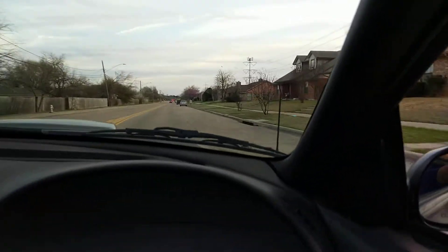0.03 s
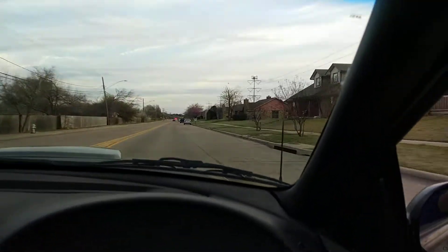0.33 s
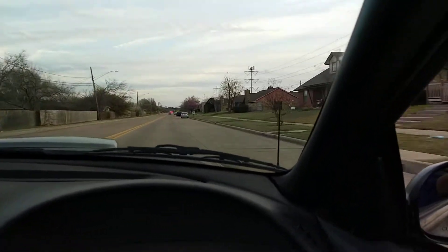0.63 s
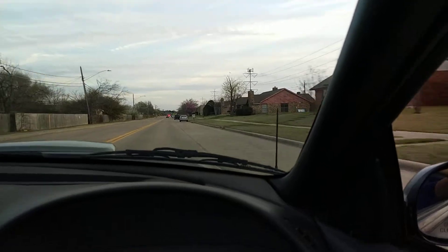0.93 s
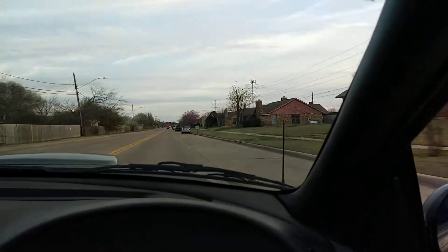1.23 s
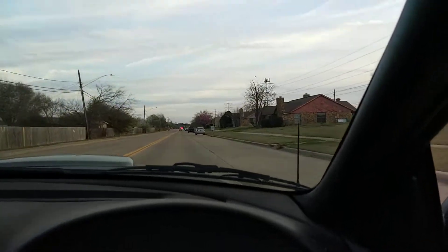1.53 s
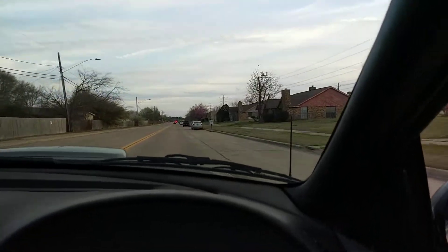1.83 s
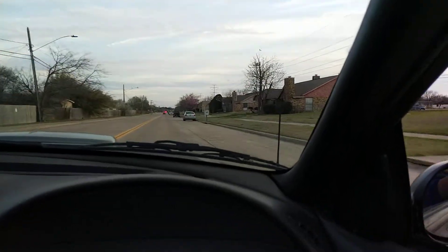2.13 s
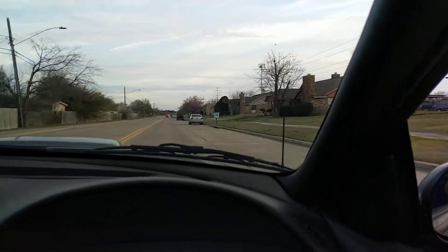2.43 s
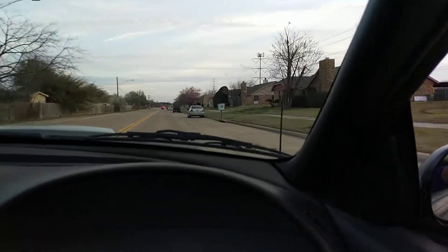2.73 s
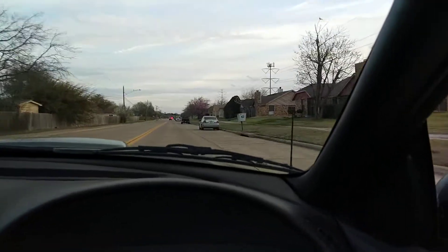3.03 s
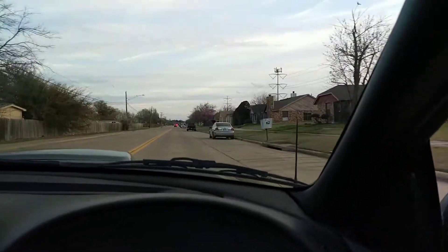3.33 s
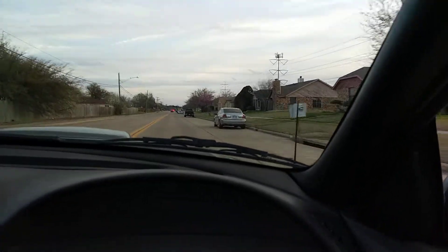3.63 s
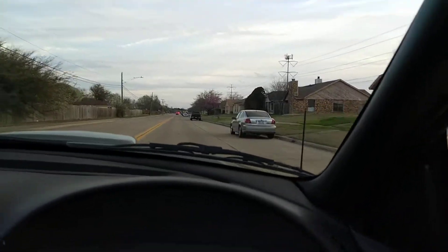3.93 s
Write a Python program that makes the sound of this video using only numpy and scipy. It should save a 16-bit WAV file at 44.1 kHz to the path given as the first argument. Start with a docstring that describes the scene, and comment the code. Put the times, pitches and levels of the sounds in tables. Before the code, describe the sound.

A car's turbo spools up with a breathy whine over the engine, then lets out a rush of air and dying chuffs. From inside the cabin, road rumble carries on, with soft booms and a trim knock.

```python
"""Inside a turbocharged car on a concrete street, microphone at the driver's seat.
The engine drones under load while the turbo whistles upward. Tyres roar throughout; bumps make the
trim knock and the cabin boom. About a second in the throttle closes: the trapped boost rushes out
and flutters in a dying run of chuffs, while the turbo slows and the engine sinks under the road."""
import sys
import numpy as np
from scipy import signal
from scipy.fft import rfft, irfft
from scipy.io import wavfile
from scipy.ndimage import uniform_filter1d

SR = 44100
rng = np.random.default_rng(int(sys.argv[2]) if len(sys.argv) > 2 else 0)


def unload_audio(sound):
    """Save the sound as a 16-bit wav file, at the path given as the first command line argument."""
    columns = np.transpose(np.atleast_2d(sound))
    # keep every value between -1 and 1, then stretch to whole-number steps
    steps = np.round(np.clip(columns, -1, 1) * 32767)
    wavfile.write(sys.argv[1], SR, steps.astype(np.int16))


N = 176400
TIME = np.arange(N) / SR
FREQS = np.maximum(np.fft.rfftfreq(N, 1 / SR), 1)
CUTOFF_HZ = 14250

# turbo spooling up and running down: time_s, whistle_hz, whistle_db, hiss_db
TURBO_SPOOL = [(0, 5000, -77, -47), (.2, 5450, -59, -44.5), (.42, 5880, -54.5, -43), (.8, 6697, -55, -41),
               (1.06, 7340, -52, -41), (1.2, 6900, -65, -50), (1.6, 5350, -72, -70), (2.0, 4190, -80, -78),
               (2.3, 3560, -80, -80), (2.95, 2500, -90, -90)]
# resonances of the intake piping: centre_hz, width_hz, lift_db
PIPE_RESONANCES = [(1870, 110, 5), (2140, 120, 7.5), (2500, 140, 5), (5497, 40, 4.5), (5790, 60, 3),
                   (6110, 50, 3.5), (6530, 55, 4), (7915, 40, 3.5), (10170, 120, 3.5), (11300, 70, 2.5),
                   (12095, 70, 2.5), (12940, 120, 2.5)]


def from_db(db):
    """Decibels to gain."""
    return 10 ** (np.asarray(db) / 20)


def unit_power(x):
    """Scale to unit power."""
    return x / np.sqrt(np.mean(x ** 2) + 1e-20)


def in_time(rows):
    """Each column of a curve, sample by sample."""
    times, *columns = np.transpose(rows)
    return [np.interp(TIME, times, column) for column in columns]


def over_hz(points):
    """A dB table on the frequency grid."""
    hz, db = np.transpose(points)
    return np.interp(np.log(FREQS), np.log(hz), db)


def drift(rate_hz):
    """Random wander with spread 1, mostly slower than rate_hz."""
    return unit_power(irfft(rfft(rng.standard_normal(N)) / (1 + (FREQS / rate_hz) ** 2), N))


def flow_noise(colour, resonances=()):
    """Stereo turbulence with a broad colour and resonances; only its treble is wide."""
    # stereo width, side against middle: frequency_hz, level_db
    stereo_width = [(2750, -100), (3300, -47), (4200, -34.5), (6000, -13.5), (9000, -3.5), (14000, -7)]
    db = over_hz(colour)
    for hz, width, lift_db in resonances:
        db = db + lift_db / (1 + (2 * (FREQS - hz) / width) ** 2)
    gain = from_db(db) / np.sqrt(1 + (colour[0][0] / FREQS) ** 4)  # rolls off below the first point
    mid, side = rfft(rng.standard_normal((2, N))) * gain
    side = side * from_db(over_hz(stereo_width))
    return unit_power(irfft(np.array([mid + side, mid - side]), N))


def breathy(hz, width_hz):
    """A narrow band of noise riding on a pitch; unit power."""
    phase = 2 * np.pi * np.cumsum(hz) / SR
    return drift(width_hz) * np.sin(phase) + drift(width_hz) * np.cos(phase)


def steadied(x, samples):
    """Even out the slow swings of a noise."""
    return x / np.sqrt(uniform_filter1d(np.mean(x ** 2, axis=0), samples) + 1e-12)


def swell(peak_s, rise_s, fall_s):
    """A rounded rise and fall about one moment."""
    return np.exp(-.5 * ((TIME - peak_s) / np.where(TIME < peak_s, rise_s, fall_s)) ** 2)


def patchy(x, depth_db, rate_hz, count=12):
    """Let overlapping bands of a noise flicker each on their own."""
    spectrum = rfft(x)
    place = np.minimum(FREQS / CUTOFF_HZ, 1) * (count - 1)
    bands = (irfft(spectrum * np.maximum(1 - np.abs(place - k), 0), N) for k in range(count))
    return unit_power(sum(band * from_db(depth_db * drift(rate_hz)) for band in bands))


def engine(wobble=0.002, roughness=0.02):
    """Orders of the firing rate, each a little rough; they sink after the throttle closes."""
    # engine under load, then easing: time_s, firing_hz, level_db
    load = [(0, 103.6, -19), (.08, 107.1, -21.5), (.16, 107.6, -17.5), (.45, 113.1, -17), (.55, 111.6, -19),
            (.75, 114.1, -16), (1.09, 117.5, -17), (1.19, 114.8, -17.5), (1.33, 120.4, -19),
            (1.6, 120, -25), (1.9, 118, -31), (4, 115, -32.5)]
    # engine orders: firing_multiple, level_db
    orders = [(.5, -10.5), (1, 1.5), (1.5, -14.5), (2, -10), (2.5, -24), (3, -31), (4, -28.5), (4.5, -26.5)]
    firing_hz, level_db = in_time(load)
    phase = 2 * np.pi * np.cumsum(firing_hz * (1 + wobble * drift(10.2))) / SR
    tones = 0
    for multiple, db in orders:
        gain = from_db(db) * (1 + roughness * drift(38))
        tones += gain * np.sin(multiple * phase + 2 * np.pi * rng.random())
    return np.sqrt(2) * from_db(level_db) * tones


def turbo(width_hz=130, waver_db=2.5):
    """The blades give a breathy whistle and its octave over the hiss of the intake."""
    # air through the intake piping: frequency_hz, density_db
    intake_colour = [(2000, 3), (3500, 2), (4900, -6), (5800, -6.5), (7500, -2.5), (9300, -4), (10400, 0),
                     (12000, 0.5), (14000, -8)]
    hz, whistle_db, hiss_db = in_time(TURBO_SPOOL)
    whistle = breathy(hz, width_hz) + breathy(2 * hz, 2 * width_hz)
    whistle *= from_db(whistle_db + waver_db * drift(9.6))
    return whistle + from_db(hiss_db) * flow_noise(intake_colour, PIPE_RESONANCES)


def road(rough_db=1.0, wind_db=-55.5, flicker_db=2.5):
    """Tyres roar on concrete, the body drones low and a faint wind passes round the pillars."""
    # tyre roar: time_s, level_db
    tyre_level = [(0, -25.5), (.08, -30.5), (.3, -28), (1, -26.5), (1.3, -24.5), (1.6, -26), (1.95, -23.5),
                  (2.15, -26), (2.4, -28), (2.55, -24.5), (2.95, -26.5), (3.07, -27), (3.5, -24.5),
                  (3.75, -28), (4, -25)]
    # tyre spectrum from inside: frequency_hz, density_db
    tyre_colour = [(150, -15), (260, 7.5), (330, 5), (450, 4), (600, -0.5), (850, -2.5), (1400, -3.5),
                   (1650, -5.5), (2100, -7.5), (2800, -21.5), (3800, -24.5), (4900, -32.5), (9000, -43)]
    # tread and cabin resonances: centre_hz, width_hz, lift_db
    cabin_resonances = [(337, 11.4, 5), (617, 21, 7), (769, 33, 5.5), (988, 116, 6), (1294, 77, 5)]
    # body drone: time_s, level_db
    body_level = [(0, -22), (1.2, -18.5), (1.7, -18.5), (2.2, -16.5), (2.5, -20.5), (2.75, -15),
                  (3.15, -18.5), (4, -17)]
    # body spectrum: frequency_hz, density_db
    body_colour = [(12, -38), (22, -34), (30, -34), (38, -1.5), (48, 2.5), (60, 3.5), (72, 1), (90, -7),
                   (125, -5.5), (160, -6.5), (190, -9.5), (225, -5), (265, -27), (400, -38), (800, -77)]
    # wind spectrum: frequency_hz, density_db
    wind_colour = [(1000, 5), (3500, -10), (6200, 1), (8000, 0), (9300, -3.5), (11500, -1), (14000, -5.5)]
    tyre_db, = in_time(tyre_level)
    body_db, = in_time(body_level)
    tyres = from_db(tyre_db + rough_db * drift(16.7)) * flow_noise(tyre_colour, cabin_resonances)
    body = from_db(body_db) * steadied(flow_noise(body_colour), samples=5000)
    wind = from_db(wind_db + flicker_db * drift(25)) * flow_noise(wind_colour)
    return tyres + body + wind


def trim_knocks(contact_db=-3, rattle_db=-3.5, rattle_s=0.0092):
    """Each knock is a sharp contact and a brief rattle that ring the modes of the trim."""
    # contacts: start_s, level_db
    knocks = [(.02, -24), (.033, -20), (2.982, -20), (2.9955, -8.5), (3.004, -18.5), (3.537, -28)]
    # trim modes: pitch_hz, level_db, t60_s
    modes = [(287, -4, 0.043), (457, -2, 0.032), (670, -5, 0.031), (910, 3.5, .028), (1055, -3, 0.037),
             (1270, -5, .025), (1320, -3.5, .025), (1590, -14, .022), (1990, -7.5, 0.018)]
    taps = sum(from_db(db + contact_db) * (np.arange(N) == int(s * SR)) for s, db in knocks)
    tails = signal.lfilter([1], [1, -np.exp(-1 / (rattle_s * SR))], taps + 1e-18)
    rattle = from_db(rattle_db) * tails / np.sqrt(rattle_s * SR / 2)
    ringing = 0
    for k, (hz, db, t60) in enumerate(modes):
        decay, angle = from_db(-60 / (t60 * SR)), 2 * np.pi * hz / SR
        force = (-1) ** k * taps + rattle * rng.standard_normal(N)
        feedback = [1, -2 * decay * np.cos(angle), decay * decay]
        ringing += from_db(db) * signal.lfilter([0, np.sin(angle)], feedback, force)
    return ringing


def cabin_booms(waver=0.081):
    """Each bump sets the cabin booming: a low, wavering tone that swells and fades."""
    # bumps: peak_s, level_db, pitch_hz, length_s
    bumps = [(0.077, -12.5, 49, 0.092), (0.534, -8.5, 48.1, 0.053), (1.668, -12.5, 50.2, .09),
             (1.769, -10.5, 44, .05), (1.977, -12, 63.2, 0.065), (2.309, -12.5, 55.15, 0.094),
             (2.426, -10, 50.5, 0.07), (2.721, -11.5, 193.4, 0.028), (2.852, -16, 184.7, 0.032),
             (3.025, -9, 52.04, 0.057), (3.29, -6, 62, 0.047), (3.73, -14.5, 66.2, 0.077),
             (3.84, -21, 61.7, 0.053)]
    wavering_time = np.cumsum(1 + waver * drift(21.7)) / SR
    booms = 0
    for peak_s, db, hz, length_s in bumps:
        tone = np.sin(2 * np.pi * (hz * wavering_time + rng.random()))
        booms += from_db(db) * swell(peak_s, length_s / 2, length_s / 2) * tone
    return booms


def boost_flutter(rough_db=1.4, chirp_db=-10.5, throat_db=-27.5, throat_growth=0.79):
    """Boost escapes as a rush and about 14 chuffs a second, chirping at the slowing turbo's octave."""
    # rush of escaping boost: time_s, level_db
    rush_level = [(1.055, -72), (1.078, -31), (1.13, -30), (1.19, -26.5), (1.32, -35), (1.5, -31),
                  (1.7, -35.5), (1.95, -35.5), (2.2, -41), (2.6, -44), (3.0, -52), (4, -75)]
    # rush spectrum: frequency_hz, density_db
    rush_colour = [(400, 2), (900, 20), (1400, 3), (2200, 9.5), (2900, 4), (4000, 4), (4900, -2.5),
                   (6500, 0), (9300, -1.5), (10800, 2.5), (12500, -1), (14000, -6.5)]
    # dying run of chuffs: peak_s, level_db, length_s
    chuffs = [(1.08, -35, .017), (1.215, -31, 0.033), (1.279, -27, 0.029), (1.354, -26, 0.022),
              (1.424, -28.5, 0.03), (1.5, -30, 0.026), (1.57, -29, 0.025), (1.643, -35, 0.034),
              (1.715, -32.5, 0.035), (1.786, -34.5, 0.022), (1.859, -35.5, 0.022), (1.934, -32.5, .019),
              (2.006, -31.5, .016), (2.075, -37.5, .021), (2.15, -36, 0.022), (2.221, -36, .021),
              (2.291, -38.5, 0.015), (2.362, -45, 0.019), (2.434, -40.5, 0.015), (2.504, -40, 0.026),
              (2.579, -43, .02), (2.642, -43.5, 0.02), (2.715, -46, .015), (2.786, -46.5, 0.016),
              (2.863, -53, .016), (2.928, -51, .018)]
    # chuff spectrum: frequency_hz, density_db
    chuff_colour = [(1500, -15), (2300, 1), (3300, -7.5), (4700, -5.5), (5800, -4), (8000, -3.5),
                    (9300, -3), (10600, 3.5), (12000, 3.5), (13200, 2), (14200, -12.5)]
    # low pipe resonances sounded by the chuffs: frequency_hz, density_db
    throat_colour = [(700, -13), (1300, 8), (2100, 1.5), (2500, -3), (3000, -31), (5000, -16)]
    rush_db, = in_time(rush_level)
    turbo_hz = in_time(TURBO_SPOOL)[0]
    pulses = sum(from_db(db) * swell(s, rise_s=0.43 * length, fall_s=0.71 * length)
                 for s, db, length in chuffs)
    air = patchy(flow_noise(chuff_colour, PIPE_RESONANCES), depth_db=3.0, rate_hz=34)
    air *= from_db(rough_db * drift(90))
    chirp = from_db(chirp_db) * breathy(2 * turbo_hz, width_hz=530)
    rush = from_db(rush_db) * flow_noise(rush_colour, PIPE_RESONANCES)
    throat_gain = from_db(throat_db) * (pulses / pulses.max()) ** throat_growth
    return rush + pulses * (air + chirp) + throat_gain * flow_noise(throat_colour, PIPE_RESONANCES)


def scene():
    """Everything as heard from the driver's seat."""
    return engine() + turbo() + boost_flutter() + road() + cabin_booms() + trim_knocks()


def record(dry):
    """The recorder's limiter ducks briefly after the loudest peaks; the top is cut steeply."""
    threshold_db, attack_s, release_db_per_s = -7, 0.00081, 47
    over_db = np.maximum(20 * np.log10(np.abs(dry).max(axis=0) + 1e-9) - threshold_db, 0)
    release_db = release_db_per_s * TIME
    held_db = np.maximum.accumulate(over_db + release_db) - release_db
    pole = np.exp(-1 / (attack_s * SR))
    limited = dry * from_db(-signal.lfilter([1 - pole], [1, -pole], held_db))
    return irfft(rfft(limited) / np.sqrt(1 + np.minimum(FREQS / CUTOFF_HZ, 1.1) ** 1200), N)


dry = scene()
out = record(dry)
unload_audio(out)
```